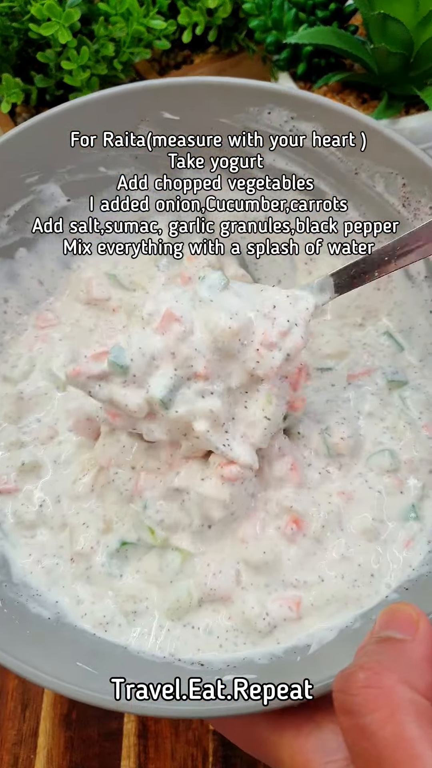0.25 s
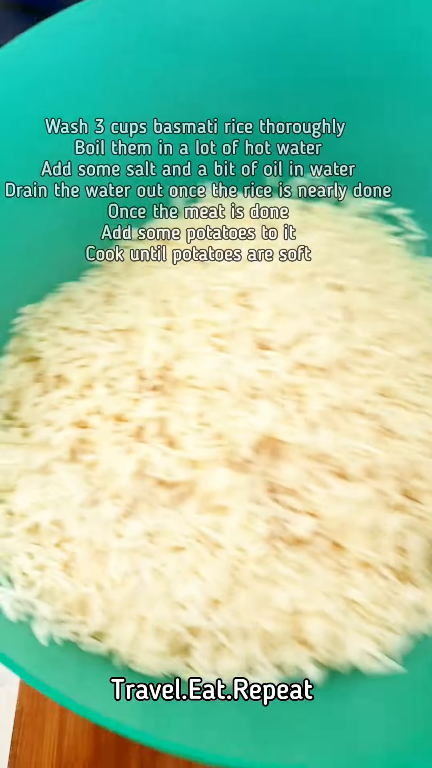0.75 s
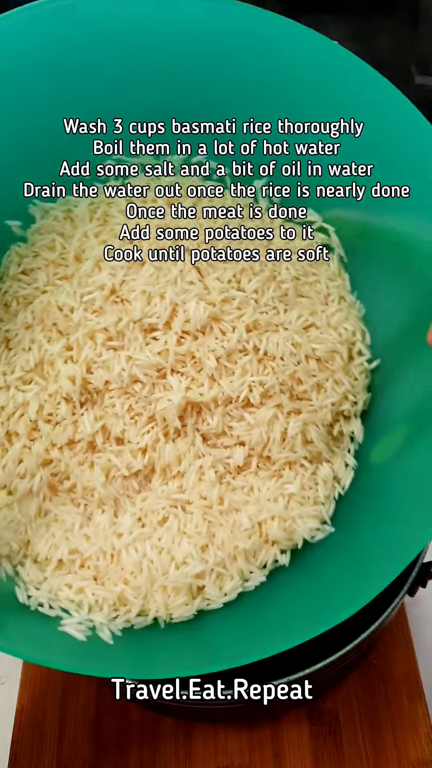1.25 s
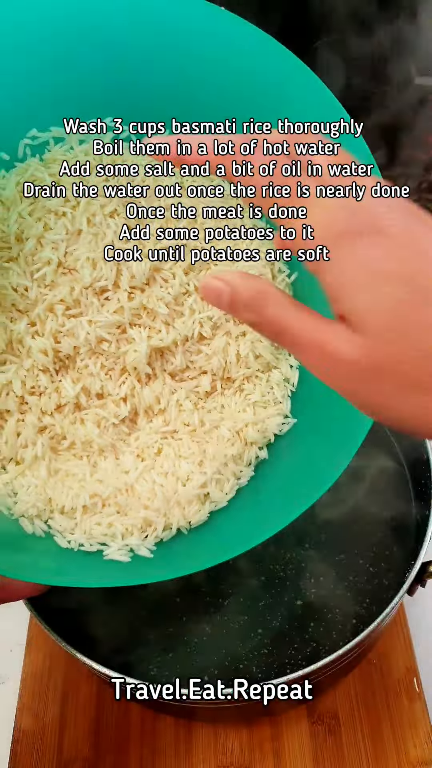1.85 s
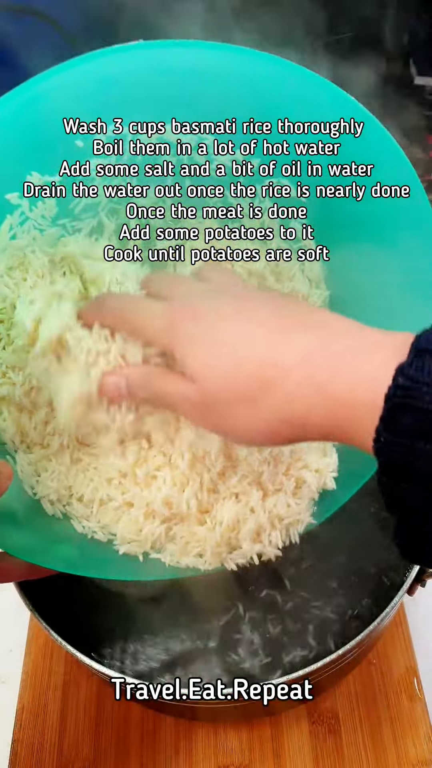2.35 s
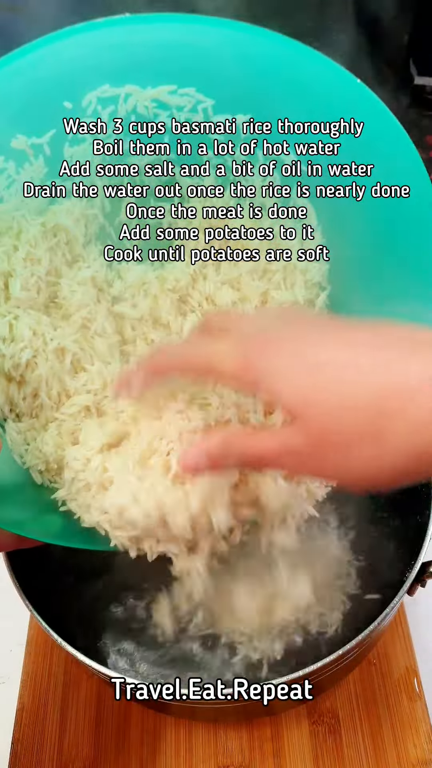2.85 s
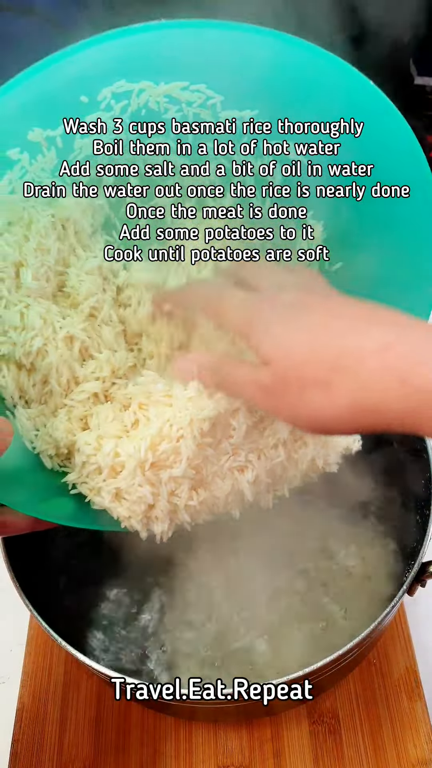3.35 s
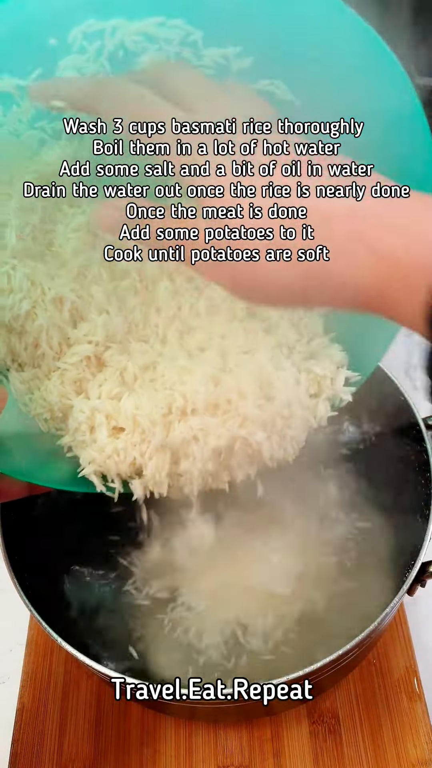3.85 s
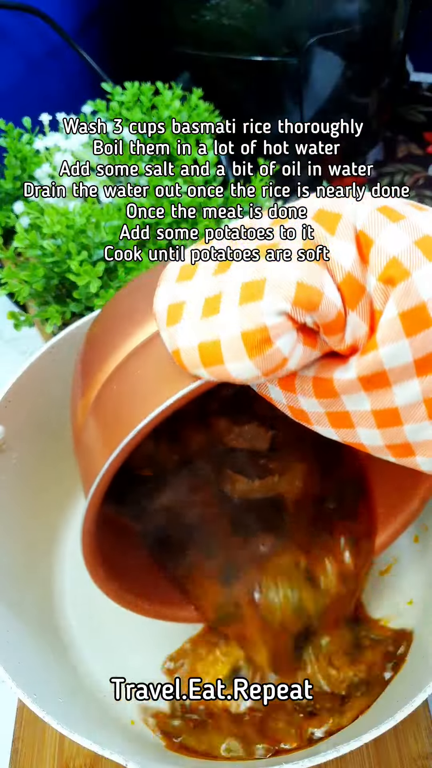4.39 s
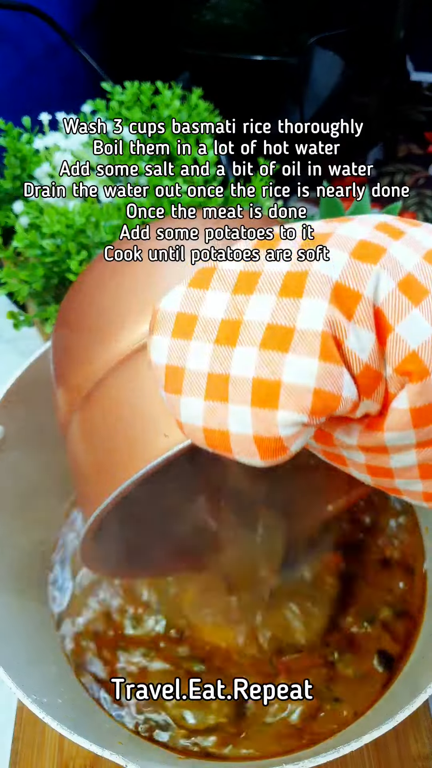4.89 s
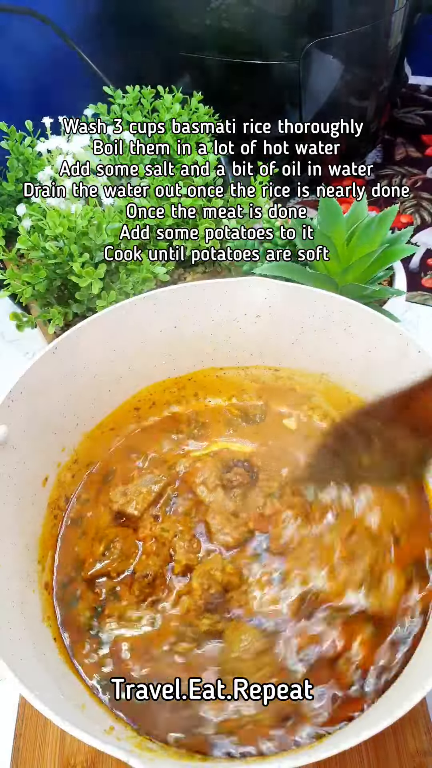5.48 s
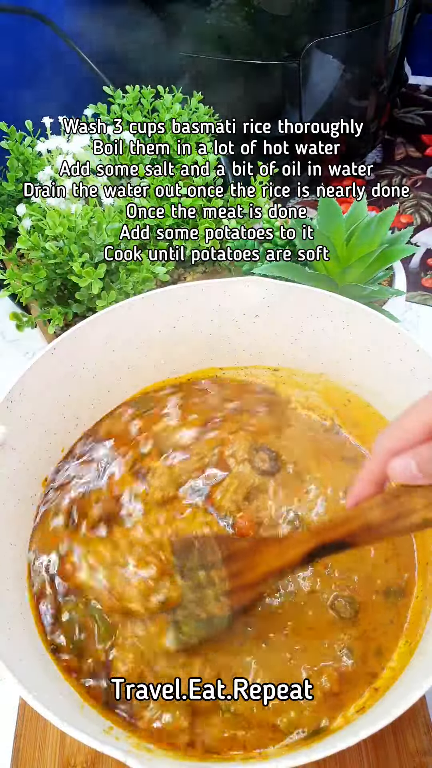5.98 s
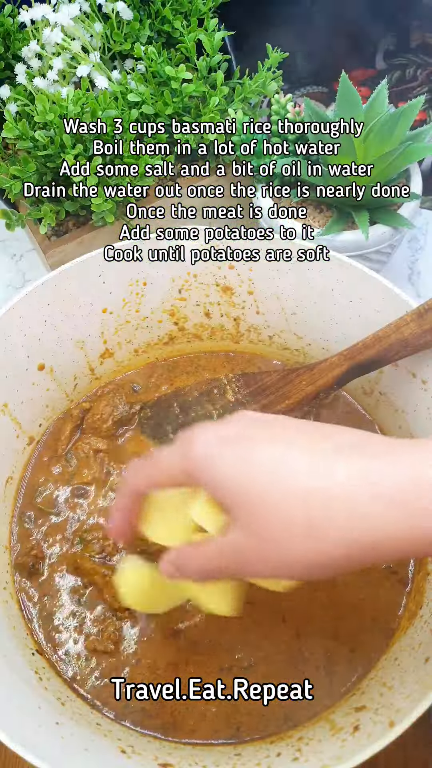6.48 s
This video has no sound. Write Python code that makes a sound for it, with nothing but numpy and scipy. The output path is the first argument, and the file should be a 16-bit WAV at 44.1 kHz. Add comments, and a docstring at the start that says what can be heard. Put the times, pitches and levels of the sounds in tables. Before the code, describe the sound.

From 0 to 0.7 s it is nearly silent: distant low rumble, faint microphone hiss, and a handling swell with a soft touch around 0.6. A hard cut starts an extractor fan, a deep wavering hum near 100 Hz under airy, slightly resonant noise, alone until 1.9. A low damped thud and click follow, then crisp rustles at 2.0 to 2.3 as a hand pushes wet rice over plastic. Rice splashes into water around 2.7 to 3.1 and more strongly at 3.7 to 3.95, with ticks and bubbles. After a cut at 4.04, curry pours from 4.25: glugs, rising bubbles, wet splats, a strong one at 4.84, and a pot knock at 5.08. From 5.24 a wooden spoon scrapes hollowly, strongest near 5.45, knocks at 5.63, and a tiny squeak comes at 6.0. At 6.19 the fan vanishes; very faint hiss and soft contacts near 6.62 and 6.7 end it. Close stereo, small kitchen, softened treble.

```python
"""Kitchen shots joined by quick cuts. First a quiet table: distant rumble, hiss noise, handling and a soft contact.
Then an extractor fan, a wavering sine hum over duct-coloured air noise, runs through four shots. Just after a cut
comes a low damped thud with a click; wet rice is pushed in and curry poured into a boiling pot: shaped grainy noise,
rising bubble rings and snaps of filtered noise. The pot is knocked (decaying modes) and a wooden spoon scrapes it
(noise through its resonances), with a second knock and a short squeak. A last quiet shot holds soft contacts."""
import sys
import numpy as np
from scipy import signal
from scipy.fft import rfft, irfft, next_fast_len
from scipy.io import wavfile
from scipy.ndimage import uniform_filter1d, map_coordinates

SR = 44100
rng = np.random.default_rng(int(sys.argv[2]) if len(sys.argv) > 2 else 0)


def master(y):
    """Save y as 16-bit WAV."""
    cut = np.clip(np.atleast_2d(y).T, -1, 1)
    pcm = np.round(cut * 32767)  # scale
    wavfile.write(sys.argv[1], SR, pcm.astype(np.int16))


N = 296793

# All source levels stand ahead of the microphone's response; colours are relative, as rush() sets the noise to rms 1.
# Shots with the fan running: start_s, end_s
FAN_SHOTS = [(.716, 1.917), (1.917, 4.045), (4.041, 5.231), (5.236, 6.192)]
FADE_IN_S, FADE_OUT_S = 0.0071, 0.0045  # at each cut of the fan shots
# Likeness of left and right noise in the room: freq_hz, likeness (1 the same, -1 opposite)
STEREO_LIKENESS = [(130, 0.7), (290, 0.81), (640, 0.62), (1400, -0.3), (3000, -0.017)]

# Quiet shots: start_s, end_s, rumble_db, hiss_db
QUIET_SHOTS = [(0, 0.713, -67.5, -63.5), (6.187, 6.74, -75, -75.5)]
# Colour of the distant rumble: freq_hz, relative_db
RUMBLE_COLOUR = [(15, -64), (25, -32), (70, -6.5), (96, -3.5), (200, -18.5), (260, -55), (440, -120)]
# Colour of the microphone's hiss, first quiet shot: freq_hz, relative_db
FIRST_HISS_COLOUR = [(120, -45), (200, -10), (310, -14.5), (366, -6), (420, -13.5), (560, -14), (700, -23),
                     (1220, -19.5), (1860, -25), (3250, -30.5), (3400, -16), (3550, -31), (5300, -25.5),
                     (5600, -16), (7600, -18.5), (8300, -26.5), (13700, -14), (15800, -23)]
# Colour of the hiss, last quiet shot: freq_hz, relative_db
LAST_HISS_COLOUR = [(120, -34), (200, -15), (283, -5), (832, -18), (1020, -11.5), (1120, -15),
                    (1610, -16.5), (1830, -18), (7890, -24.5), (12500, -16), (15800, -23.5)]
# Handling rumble: peak_s, level_db, rise_s, fall_s (times for 20 dB)
HANDLING_SWELLS = [(.57, -51, 0.11, 0.085), (6.72, -64, 0.027, .04)]
# Soft contacts in the quiet shots: start_s, level_db, pitch_hz, t60_s
SOFT_CONTACTS = [(.612, -55, 14700, 0.04), (6.52, -72, 476, .08), (6.619, -55.5, 479, 0.16),
                 (6.62, -58, 305, 0.056), (6.715, -63, 450, 0.087)]

HUM_HZ = 99.97
# Motor hum in each fan shot, before its waver: level_db
HUM_LEVELS_DB = [-34.5, -34, -34, -38]
WAVER_DB, WAVERS_PER_S = 1.1, 15  # spread and rate of the random points the hum level passes through
# Clearest swells and dips of the hum: centre_s, change_db, half_width_s (to 1/e of the change)
HUM_CHANGES = [(.92, 2.5, 0.054), (1.9, -3, 0.036), (2.0, 2.5, .04), (2.76, -3, 0.036), (2.87, 3.5, 0.035),
               (3.19, 2.5, 0.047), (3.61, 4, 0.033), (3.78, 5, .04), (4.83, -5, 0.039), (4.89, 3.5, 0.049),
               (5.14, 1.5, 0.07), (5.26, -3, 0.026), (5.59, -4.5, .03), (5.66, 8, 0.042),
               (5.93, 3.5, 0.075), (6.06, -15, 0.045), (6.165, 2, .03)]
# Fan air in each fan shot: level_db
FAN_AIR_LEVELS_DB = [-43, -42, -43, -43]
# Colour of the air ahead of the resonances: freq_hz, relative_db
FAN_AIR_COLOUR = [(25, -30.5), (50, -2), (130, 2), (200, -13.5), (245, -3), (300, -3), (520, -10.5),
                  (640, -16), (1300, -14), (2600, -23.5), (7200, -27.5), (9000, -29.5), (14000, -28.5),
                  (15800, -27)]
# Duct resonances: centre_hz, width_hz, relative_db
DUCT_MODES = [(166.4, 3.5, 2.5), (380.3, 16.3, 1), (470.4, 7.6, 15), (765.4, 3.1, 10.5), (1274, 8.1, -4.5),
              (2260, 18, 1)]
# The fan's high bands: centre_hz, width_hz, relative_db
FAN_HIGH_BANDS = [(3424, 74, -2.5), (5260, 69, 2), (7120, 100, -4.5), (12180, 410, -0.5), (15600, 400, -2)]

# Wet rice sliding and sauce flowing: time_s, level_db
SLOSH_LEVEL = [(1.92, -75), (2.16, -59), (2.9, -55.5), (3.1, -55.5), (4.25, -56.5), (4.4, -49.5),
               (4.65, -55.5), (4.87, -55), (5.07, -53.5), (5.1, -41), (5.16, -41.5), (5.228, -47)]
# Colour of the slosh: freq_hz, relative_db
SLOSH_COLOUR = [(450, 0.5), (700, 1), (1100, 1), (2000, -1.5), (3500, -8.5), (6000, -28.5)]
# Thin spray between the splashes: time_s, level_db
SIMMER_LEVEL = [(1.93, -63), (2.7, -57.5), (3.2, -64.5), (3.68, -51.5), (4.04, -62.5), (4.07, -75.5),
                (4.33, -54), (4.63, -64), (4.8, -52.5), (5.228, -69.5)]
# Rice and sauce hitting water: peak_s, level_db, rise_s, fall_s (times for 20 dB), fine_mist_db over the splash
SPLASH_SWELLS = [(2.72, -52.5, 0.02, 0.13, 2.5), (2.79, -47.5, 0.03, 0.84, 5.5),
                 (3.03, -45.5, 0.052, 0.099, 1), (3.7, -42.5, 0.011, 0.032, 6.5),
                 (3.75, -43.5, 0.034, 0.12, 2), (3.785, -45.5, 0.025, 0.17, 6),
                 (3.89, -47.5, 0.038, 0.083, 1.5), (3.94, -51, .02, .1, 0.5),
                 (4.03, -57.5, 0.032, 0.035, -6.5), (4.35, -43.5, 0.022, 0.064, 2),
                 (4.46, -43, 0.038, 0.12, 1), (4.51, -44, .04, 0.08, -1.5), (4.54, -45, 0.017, 0.054, -0.5),
                 (4.845, -38.5, 0.037, 0.065, -7), (4.94, -42, 0.016, 0.029, 0.5),
                 (5.02, -56.5, 0.055, 0.086, 5.5), (5.09, -46.5, 0.019, 0.062, 1),
                 (5.15, -49.5, .03, 0.086, 3), (5.19, -43, 0.038, 0.052, -0.5)]
# Colour of the spray: freq_hz, relative_db
SPRAY_COLOUR = [(900, -37), (1600, -16.5), (2500, -9), (4500, -8), (6000, -6.5), (9000, -10.5),
                (12000, -11.5), (15800, -12.5)]
# Low thud just after the cut: level_db, pitch_hz, t60_s
CUT_THUD = (-27.5, 230, 0.018)
CUT_THUD_S = 1.932
# Short snaps of noise, the first a click just after the cut: start_s, level_db, centre_hz
NOISE_SNAPS = [(1.9326, -52, 3420), (2.3893, -42.5, 5200), (2.5918, -40, 7300), (2.722, -32.5, 6040),
               (2.8353, -35.5, 5740), (2.9944, -32, 10880), (3.0173, -36, 3440), (3.132, -42, 6780),
               (3.4422, -41, 4060), (3.4972, -38.5, 4340), (3.6986, -29, 3230), (3.7514, -32.5, 6490),
               (3.7822, -31, 10500), (3.8923, -40, 6060), (3.938, -34.5, 3420), (4.0292, -37, 3400),
               (4.3502, -31.5, 5830), (4.4132, -40, 3190), (4.4445, -40.5, 3230), (4.4607, -39, 4840),
               (4.5366, -32, 5800), (4.6656, -44, 14400), (4.841, -23.5, 4070), (4.8971, -37.5, 12560),
               (5.0123, -36.5, 4070), (5.132, -37, 3260), (5.1515, -30.5, 11570)]
TICK_COUNT, TICK_TOP_DB, TICK_T60_S = 320, 6, 0.0061  # small random snaps; loudest level over the spray gain
DROP_PAN, DROP_PAN_SCATTER = 1.5, 2  # pan of drops and its spread from drop to drop, scaled in add()
# A hand pushing rice over the plastic bowl: peak_s, level_db, rise_s, fall_s (times for 20 dB), low_part_db over it
RICE_PUSHES = [(2.018, -48.5, 0.017, 0.11, -12.5), (2.056, -49, .025, 0.092, -19.5),
               (2.22, -64, 0.11, .2, 18), (2.29, -52.5, 0.13, .09, 2.5)]
# Single bubbles, and last a short squeaky ring in the scraping shot: start_s, level_db, starting_pitch_hz, t60_s
RISING_RINGS = [(2.977, -37.5, 1370, .031), (3.031, -30, 1370, 0.026), (3.051, -30, 6230, 0.032),
                (3.081, -34.5, 3130, 0.032), (3.155, -33, 1990, 0.021), (3.699, -41, 3200, 0.041),
                (3.761, -26, 1820, 0.032), (3.819, -28.5, 2134, 0.039), (3.825, -34, 2620, 0.032),
                (3.904, -34, 2120, 0.022), (3.939, -41, 3340, .027), (4.256, -24, 1190, 0.014),
                (4.325, -32, 1980, .03), (4.35, -32.5, 3260, 0.037), (4.366, -33, 5770, 0.045),
                (4.372, -31, 1910, .03), (4.385, -26, 1450, 0.05), (4.407, -37.5, 840, 0.074),
                (4.413, -33.5, 3210, 0.055), (4.428, -28.5, 893, 0.047), (4.454, -25, 947, 0.03),
                (4.462, -24, 1180, 0.024), (4.477, -36.5, 2160, 0.035), (4.511, -19.5, 5400, 0.021),
                (4.517, -39, 1470, 0.052), (4.565, -23, 1085, 0.042), (4.616, -38, 2170, .035),
                (4.717, -38.5, 6750, 0.036), (4.77, -24.5, 1137, 0.05), (4.814, -39, 2280, 0.047),
                (4.837, -30, 1680, 0.077), (4.858, -22, 3830, 0.03), (4.916, -33.5, 1970, 0.072),
                (4.939, -32.5, 920, 0.064), (4.954, -22.5, 932, 0.046), (5.025, -30.5, 1755, 0.067),
                (5.13, -32.5, 2300, 0.052), (5.189, -36, 1990, .03), (5.211, -37, 3230, 0.043),
                (5.285, -35.5, 1780, 0.017), (5.996, -43, 1710, 0.072)]

# Knocks on the pot: start_s, level_db, crack_db relative to the knock, before the crack is smoothed
POT_KNOCKS = [(5.0835, -26, 0), (5.628, -29, -2.5)]
# Each knock lands a second time: delay_s, change_db
KNOCK_BOUNCE = (.011, -8.5)
# Ring of the knocked pot: pitch_hz, t60_s, first_knock_db, second_knock_db (relative to the knock)
KNOCK_RING = [(160.7, 0.18, -6, -12), (242.3, 0.14, -20, 1.5), (309, 0.29, -5, -9), (361, 0.12, -3.5, -32),
              (472.4, 0.32, -15.5, -4), (778, 0.14, -8.5, -2), (921, 0.043, 6.5, 5.5), (1193, 0.05, -2, -8),
              (1825, 0.045, -10, -7.5), (2050, 0.037, -10, -23), (3200, 0.057, -8.5, -35)]
# Spoon pressure on the pot floor: time_s, level_db
SPOON_PRESSURE = [(5.24, -55), (5.336, -44.5), (5.43, -40), (5.458, -37), (5.582, -46.5), (5.706, -57),
                  (5.9, -54.5), (5.95, -72)]
# Resonances of the scraped pot: centre_hz, width_hz, relative_db
SCRAPED_POT_MODES = [(1643, 66, 2.5), (2190, 60, 7), (2890, 46, -3.5), (4450, 200, -0.5), (5370, 180, -9.5),
                     (6380, 200, -1)]
# The pot's deep ring under the sauce: centre_hz, width_hz, relative_db
DEEP_RING_MODES = [(265, 40, 0), (354, 19, -5), (420, 18, 1.5), (548, 35, 2)]
# The pot's three loudest groups of modes, each: centre_hz, width_hz, relative_db
LOUDEST_MODES = [
    [(725, 63, -5), (902, 68, 5.5)],
    [(1224, 39, 0)],
    [(3154, 20, 0)],
]
# The spoon catches on the floor: peak_s, fall_s (for 20 dB), deep_ring_db, then level_db of each loudest group
SPOON_CATCHES = [(5.365, 0.1, -45, -38.5, -40, -44), (5.425, 0.1, -39.5, -56, -36.5, -58),
                 (5.465, 0.27, -47.5, -33.5, -44.5, -47.5), (5.565, 0.1, -44, -41, -50, -74)]
CATCH_RISE_S = 0.035  # for 20 dB
# The same four rings under plain stirring: level_db
STIRRED_RING_DB = [-55.5, -66, -71, -83.5]

# Decay of the kitchen's answer: freq_hz, t60_s
ROOM_DECAY = [(200, 0.29), (2000, 0.15), (12000, 0.084)]
# Left channel over right at the microphone: freq_hz, left_minus_right_db
STEREO_TILT = [(100, .9), (700, 2.8), (2000, 1), (5000, 1.3), (9000, 0), (15000, 3)]
# The microphone's treble dip: freq_hz, level_db
MIC_DIP = [(7000, -0.5), (8200, -6.5), (10000, -3.5), (12000, -2)]
TOP_HZ = 15830  # nothing is kept from here up


def amp(db):
    """Decibels to gain."""
    return 10 ** (np.asarray(db) / 20)


def unit(x):
    """x at rms 1."""
    return x / np.sqrt(np.mean(x ** 2) + 1e-20)


def along(points, hz):
    """(freq_hz, value) points joined on a log frequency axis."""
    f, values = np.transpose(points)
    return np.interp(np.log(hz + 1), np.log(f + 1), values)


def level_curve(rows):
    """Gain per sample through (time_s, level_db) points; practically silent outside them."""
    time_s, level_db = np.transpose(rows)
    return amp(np.interp(np.arange(N) / SR, time_s, level_db, left=-200, right=-200))


def swells(rows):
    """Summed gain of swells exponential on both flanks, plain and with each one's extra dB."""
    t = np.arange(0, N / SR, .001)
    each = np.array([amp(db - 20 * np.maximum((s - t) / rise, (t - s) / fall))
                     for s, db, rise, fall, *_ in rows])
    extra = amp([sum(row[4:]) for row in rows])
    return [np.interp(np.arange(N) / SR, t, gain) for gain in (each.sum(0), extra @ each)]


def filtered(x, response):
    """x times a complex response of frequency, with room for the tail."""
    m = next_fast_len(x.shape[-1] + SR // 2)
    spectrum = rfft(x, m) * response(np.fft.rfftfreq(m, 1 / SR))
    return irfft(spectrum, m)[..., :x.shape[-1]]


def band(x, hz, octaves):
    """x at rms 1 through a band-pass around hz."""
    edges = np.clip([hz * 2 ** (-octaves / 2), hz * 2 ** (octaves / 2)], 20, .45 * SR)
    return unit(signal.lfilter(*signal.butter(2, edges, "band", fs=SR), x))


def modes(table, f):
    """Causal response of (centre_hz, width_hz, relative_db) resonances, alternating in sign."""
    return sum((-1) ** k * amp(db) * 1j * f * width / (hz * hz - f * f + 1j * f * width)
               for k, (hz, width, db) in enumerate(table))


def rush(colour, grain_db=-40., patchy_db=.5, near=0., span=(0, 6.74)):
    """Stereo noise, rms 1 inside span (s): random patches and shared bursts; near raises left-right likeness."""
    start = round(span[0] * SR)
    n = min(round(span[1] * SR), N) - start
    z = signal.stft(rng.standard_normal((2, n)), nperseg=512, noverlap=256)[2].astype(np.complex64)
    # smooth a random gain field over frequency and time
    field = uniform_filter1d(rng.standard_normal(z.shape[1:]), 6, 0)
    field = uniform_filter1d(field, 10, 1)
    pair = signal.istft(z * amp(patchy_db * unit(field)), nperseg=512)[1][:, :n]
    # about 250 sudden bursts per second, each fading with a 4 ms time constant
    hits = rng.exponential(1, n) * (rng.random(n) < 250 / SR)
    bursts = signal.lfilter([1], [1, -np.exp(-1 / (.004 * SR))], hits)
    pair = pair * (1 + amp(grain_db) * bursts)

    def mid_side(hz):
        turn = np.arccos(np.clip(along(STEREO_LIKENESS, hz) + near, -1, .99)) / 2
        return colour(hz) * [np.cos(turn), np.sin(turn)]

    mid, side = filtered(pair, mid_side)
    return np.pad(unit(np.array([mid + side, mid - side])), ((0, 0), (start, N - start - n)))


def add(track, s, sound, pan=0., lag=0):
    """Mixes in a short sound: left gains 0.27 dB and right loses 0.87 dB per unit of pan; left lags by samples."""
    for side_db, channel, lag_samples in ((0.27, 0, lag), (-0.87, 1, 0)):
        at = round(s * SR) + lag_samples
        track[channel, at:at + len(sound)] += amp(pan * side_db) * sound


def drop_pan():
    """A random place for one drop."""
    return DROP_PAN + DROP_PAN_SCATTER * rng.standard_normal()


def soft_contacts():
    """Damped sines whose phase wanders at random, so the rings are unclear."""
    out = np.zeros((2, N + SR))
    t = np.arange(SR // 4) / SR
    for s, db, hz, t60 in SOFT_CONTACTS:
        wander = 0.074 * np.cumsum(uniform_filter1d(rng.standard_normal(len(t)), 60))
        add(out, s, amp(db - 60 * t / t60) * np.sin(2 * np.pi * hz * t + wander))
    return out[:, :N]


def quiet():
    """Distant rumble noise, swollen by handling, and the microphone's own hiss, with soft contacts."""
    out = soft_contacts()
    now = np.arange(N) / SR
    rumble = rush(lambda f: amp(along(RUMBLE_COLOUR, f)))
    handling = swells(HANDLING_SWELLS)[0]
    for (start, end, rumble_db, hiss_db), colour in zip(QUIET_SHOTS, (FIRST_HISS_COLOUR, LAST_HISS_COLOUR)):
        hiss = amp(hiss_db) * rush(lambda f: amp(along(colour, f)), patchy_db=1.3, span=(start, end))
        inside = (now >= start) * (now < end)
        out += inside * ((amp(rumble_db) + handling) * rumble + hiss)
    return out


def shot_gain(levels_db):
    """One steady gain for each fan shot; the louder holds where two overlap."""
    t = np.arange(N) / SR
    return np.max([amp(db) * (t >= start) * (t < end)
                   for (start, end), db in zip(FAN_SHOTS, levels_db)], axis=0)


def fan():
    """A mains-driven hum, a sine of wavering level, over air noise that rings in the duct."""
    t = np.arange(N) / SR
    air = rush(lambda f: amp(along(FAN_AIR_COLOUR, f)) * (1 + np.abs(modes(DUCT_MODES + FAN_HIGH_BANDS, f))))
    waver = map_coordinates(rng.standard_normal(200), [t * WAVERS_PER_S])
    change_db = sum(db * np.exp(-((t - s) / width) ** 2) for s, db, width in HUM_CHANGES)
    hum_gain = shot_gain(HUM_LEVELS_DB) * amp(WAVER_DB * waver + change_db)
    hum = np.sqrt(2) * hum_gain * np.sin(2 * np.pi * HUM_HZ * t + 1.8)
    return shot_gain(FAN_AIR_LEVELS_DB) * air + hum * amp([[.35], [-.35]])  # hum 0.7 dB louder on the left


def slosh(wet_span):
    """Sliding wet rice and flowing sauce: grainy noise, more alike in left and right."""
    noise = rush(lambda f: amp(along(SLOSH_COLOUR, f)), grain_db=-11.0, patchy_db=3.0, near=0.22, span=wet_span)
    return level_curve(SLOSH_LEVEL) * noise


def spray_gain():
    """Gain of the spray: the splashes over the thin simmer."""
    return swells(SPLASH_SWELLS)[0] + level_curve(SIMMER_LEVEL)


def spray(wet_span):
    """Many unresolved droplets as grainy noise; the finest, above 8 kHz, have their own splash level."""
    splash, misty = swells(SPLASH_SWELLS)
    noise = rush(lambda f: amp(along(SPRAY_COLOUR, f)), grain_db=0.5, patchy_db=3.0, span=wet_span)
    mist = filtered(noise, lambda f: 1 / (1 + (8000 / (f + 1)) ** 6))
    return spray_gain() * noise + (misty - splash) * mist


def cut_thud():
    """A low thud just after the cut: a fast-damped cosine."""
    out = np.zeros((2, N + SR))
    t = np.arange(SR // 2) / SR
    db, hz, t60 = CUT_THUD
    add(out, CUT_THUD_S, amp(db - 60 * t / t60) * np.cos(2 * np.pi * hz * t))
    return out[:, :N]


def snaps(fizz):
    """Short decaying bursts of band-passed noise, the first a click just after the cut, and small random ticks."""
    out = np.zeros((2, N + SR))
    t = np.arange(SR // 20) / SR
    hits = [(*row, .015) for row in NOISE_SNAPS]  # t60 of 15 ms
    for when, pitch, size in rng.random((TICK_COUNT, 3)):
        s = 2 + 3.2 * when
        db = 20 * np.log10(fizz[round(s * SR)]) + TICK_TOP_DB - 12 * size
        hits.append((s, db, 3500 * 3.5 ** pitch, TICK_T60_S))
    for s, db, hz, t60 in hits:
        burst = band(rng.standard_normal(len(t)), hz, octaves=1.65)
        add(out, s, burst * amp(db - 60 * t / t60), drop_pan(), lag=4)
    return out[:, :N]


def pushed_rice():
    """A hand pushes rice over the plastic bowl: a crisp resonant rustle and a lower part."""
    push, low = swells(RICE_PUSHES)
    crisp_modes = [(1750, 520, 0.42), (3730, 1000, -1.5)]  # centre_hz, width_hz, relative_db
    crisp = rush(lambda f: modes(crisp_modes, f) / (1 + (f / 5000) ** 4), grain_db=0.0, span=FAN_SHOTS[1])
    body = rush(lambda f: modes([(960, 700, 0)], f), grain_db=-7.0, span=FAN_SHOTS[1])
    return push * crisp + low * body


def rising_ring(hz, t60, rise):
    """A damped, trembling ring of climbing pitch, as of a bubble nearing the surface, in a small splash."""
    t = np.arange(SR // 14) / SR
    tremble = 0.11 * np.cumsum(uniform_filter1d(rng.standard_normal(len(t)), 40))
    onset = 1 - np.exp(-t / 0.0013)
    ring = onset * np.sin(2 * np.pi * hz * (t + rise * t * t / t60) + tremble)
    splash = band(rng.standard_normal(len(t)), 1.29 * hz, octaves=1.1)
    return amp(-60 * t / t60) * ring + amp(-16 - 60 * t / (0.86 * t60)) * splash


def bubbles_and_squeak(fizz):
    """Single bubbles and a last short squeak as rising rings, and small random bubbles that follow the spray."""
    out = np.zeros((2, N + SR))
    for s, db, hz, t60 in RISING_RINGS:
        add(out, s, amp(db) * rising_ring(hz, t60, rise=.11), drop_pan(), lag=4)
    for when, pitch, size in rng.random((170, 3)):
        s, hz = 2 + 2.9 * when, 1000 * 6.5 ** pitch
        gain = fizz[round(s * SR)] * amp(-0.5 - 17 * size)
        add(out, s, gain * rising_ring(hz, 60 / hz, rise=0.15), drop_pan(), lag=4)
    return out[:, :N]


def pot_knocks():
    """Each knock rings the pot's decaying modes under a noisy crack, then bounces once."""
    out = np.zeros((2, N + SR))
    t = np.arange(SR // 2) / SR
    onset = 1 - np.exp(-t / 0.001)
    for k, (s, db, crack_db) in enumerate(POT_KNOCKS):
        for later, change_db in ((0, 0), KNOCK_BOUNCE):
            ring = sum(amp(row[2 + k] - 60 * t / row[1]) * np.sin(2 * np.pi * row[0] * t) for row in KNOCK_RING)
            crack = amp(crack_db - 60 * t / 0.099) * uniform_filter1d(rng.standard_normal(len(t)), 7)
            add(out, s + later, amp(db + change_db) * (ring * onset + crack), lag=2)
    return out[:, :N]


def spoon_scrape():
    """Friction noise of the wooden spoon excites the pot's resonances, which swell where it catches."""
    def scrape_colour(f):
        plain_friction = amp(-0.5) / (1 + (f / 4000) ** 2) * (f > 600)
        return modes(SCRAPED_POT_MODES, f) + plain_friction

    friction = rush(scrape_colour, grain_db=-18.5, patchy_db=3.0, near=0.2, span=FAN_SHOTS[3])
    scrape = level_curve(SPOON_PRESSURE) * friction
    for k, table in enumerate([DEEP_RING_MODES, *LOUDEST_MODES]):
        catches = [(s, dbs[k], CATCH_RISE_S, fall) for s, fall, *dbs in SPOON_CATCHES]
        ring_gain = amp(STIRRED_RING_DB[k]) + swells(catches)[0]
        scrape += ring_gain * rush(lambda f: modes(table, f), grain_db=-9.5, near=0.23, span=FAN_SHOTS[3])
    return scrape


def room(x):
    """The kitchen's answer, 130 samples late: noise tails decaying by frequency, different on each side."""
    hz, t, z = signal.stft(rng.standard_normal((2, SR // 2)), SR, nperseg=256)
    decay = amp(-60 * t / along(ROOM_DECAY, hz)[:, None])
    tail = signal.istft(z * decay, SR, nperseg=256)[1]
    late = np.pad(x, ((0, 0), (130, 0)))
    return signal.fftconvolve(late, tail / np.linalg.norm(tail[0]), axes=1)[:, :N]


def scene():
    """The fan shots are cut in and out, with short fades, between the quiet ones."""
    t = np.arange(N) / SR
    wet_span = FAN_SHOTS[1][0], FAN_SHOTS[2][1]
    fizz = spray_gain()
    textures = fan() + slosh(wet_span) + spray(wet_span) + pushed_rice() + spoon_scrape()
    impacts = cut_thud() + snaps(fizz) + bubbles_and_squeak(fizz) + pot_knocks()
    loud = textures + impacts + amp(-6.0) * room(impacts)
    running = sum(np.clip(np.minimum((t - start) / FADE_IN_S, (end - t) / FADE_OUT_S), 0, 1)
                  for start, end in FAN_SHOTS)
    return running * loud + quiet()


def record(dry):
    """The stereo microphone tilts left and right, dips in the treble and keeps nothing above its band limit."""
    def response(hz):
        tilt_db = along(STEREO_TILT, hz) * [[.5], [-.5]]
        return amp(tilt_db + along(MIC_DIP, hz)) * (hz < TOP_HZ)

    return filtered(dry, response)


dry = scene()
out = record(dry)
master(out)
```